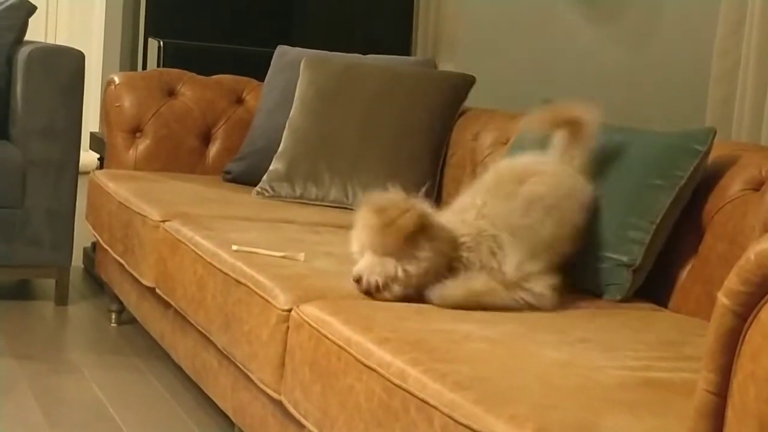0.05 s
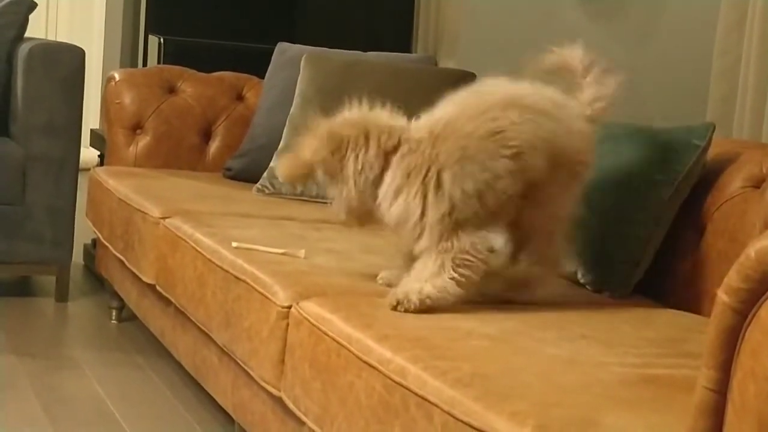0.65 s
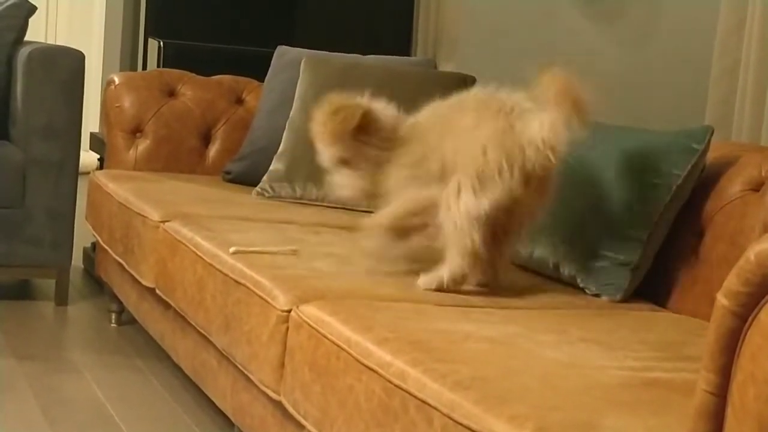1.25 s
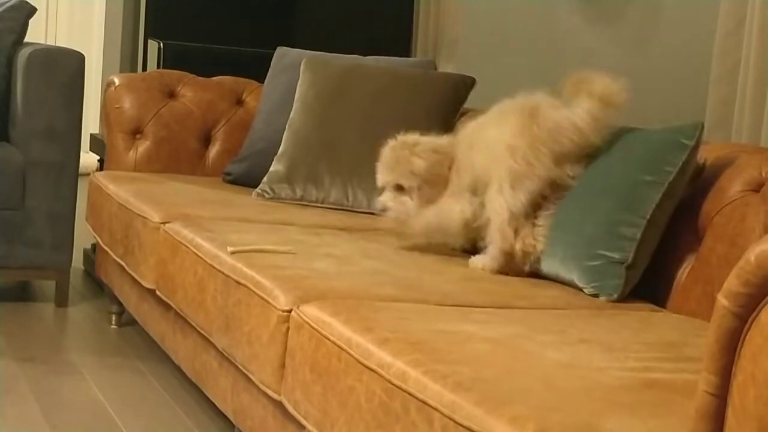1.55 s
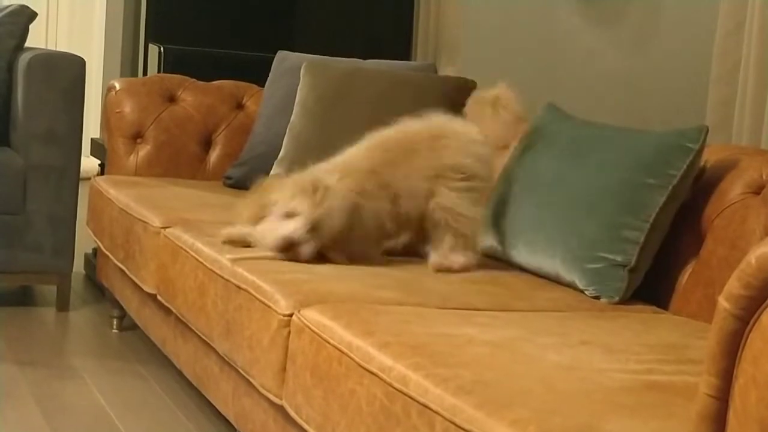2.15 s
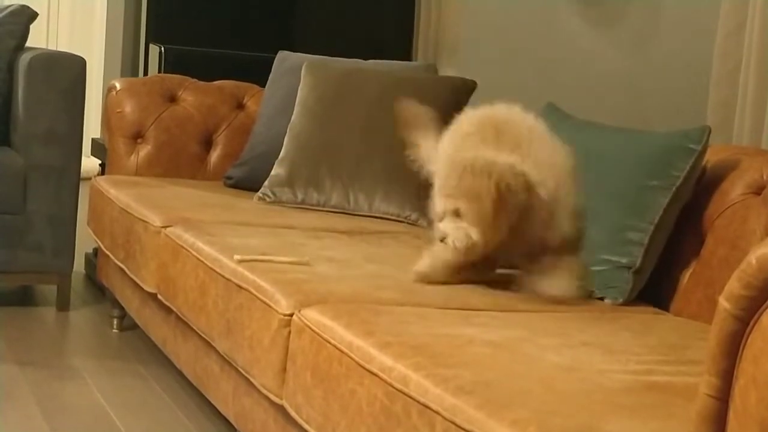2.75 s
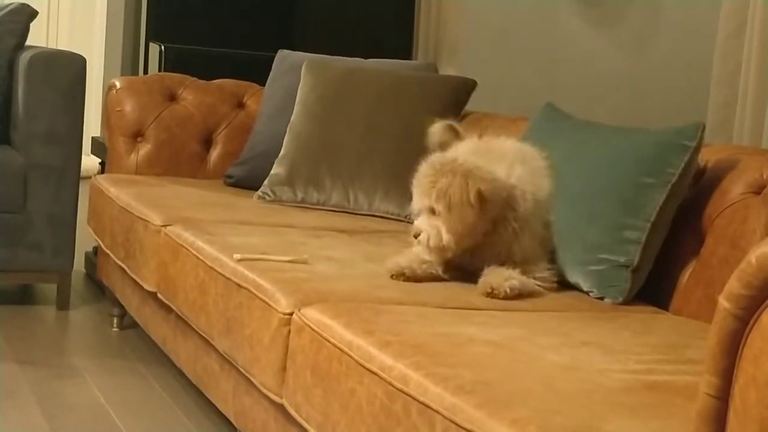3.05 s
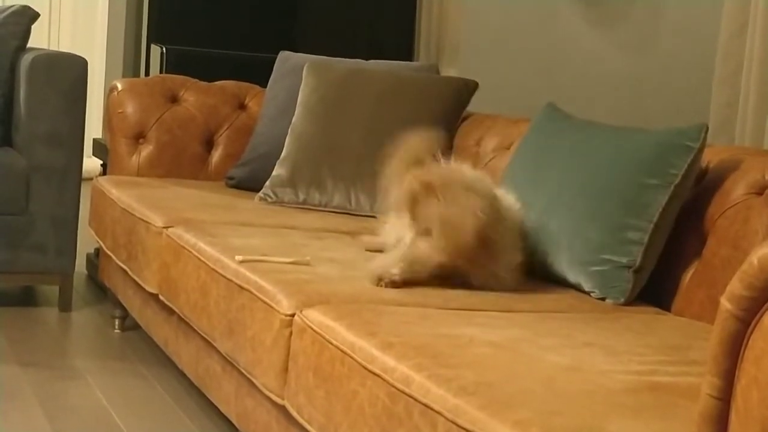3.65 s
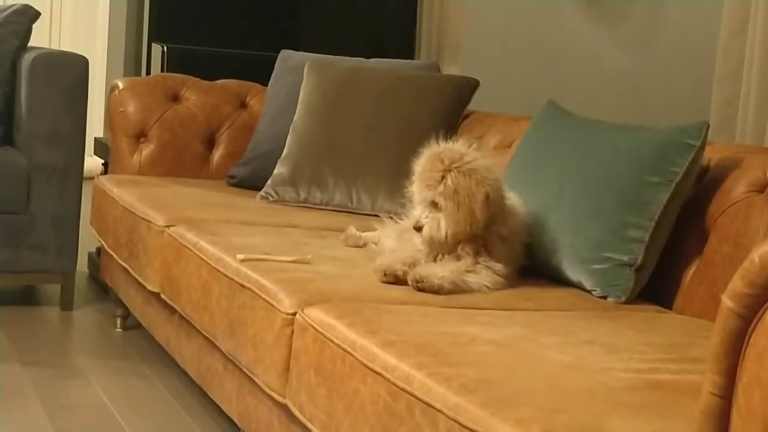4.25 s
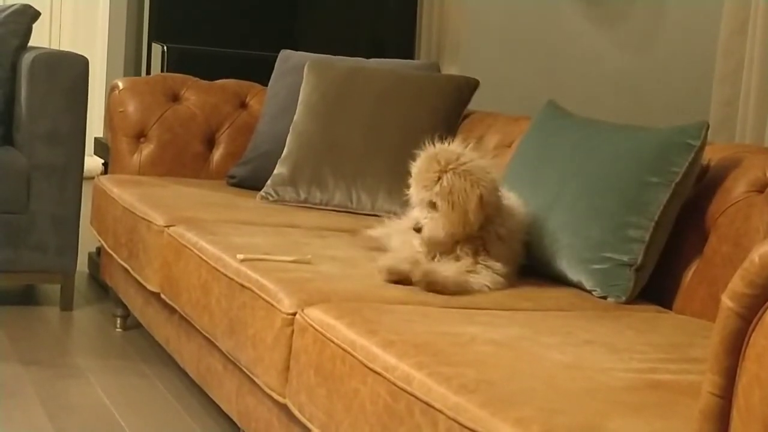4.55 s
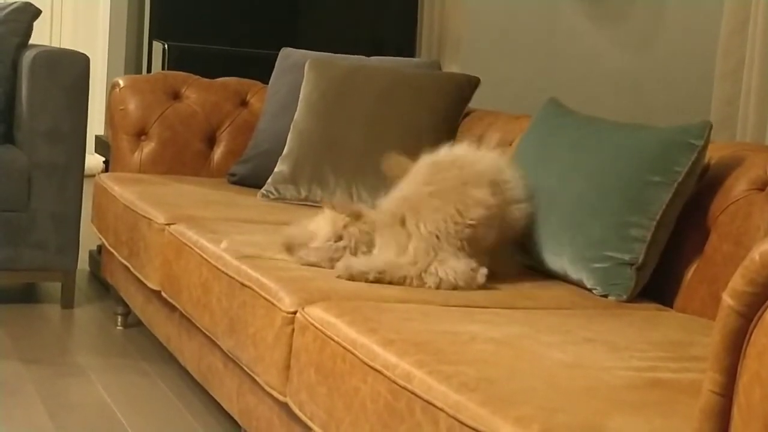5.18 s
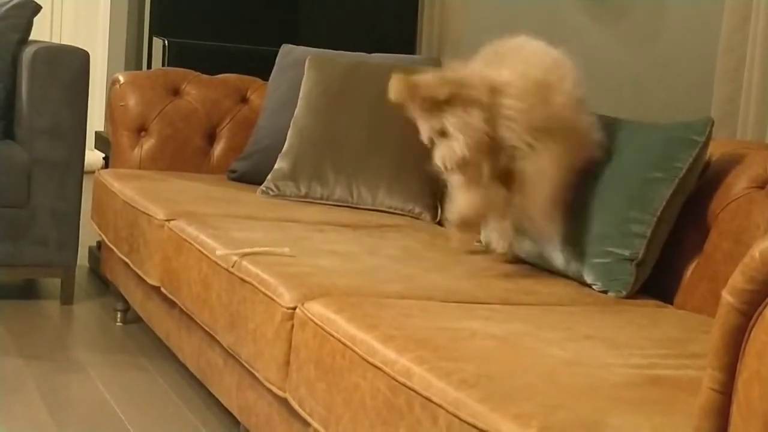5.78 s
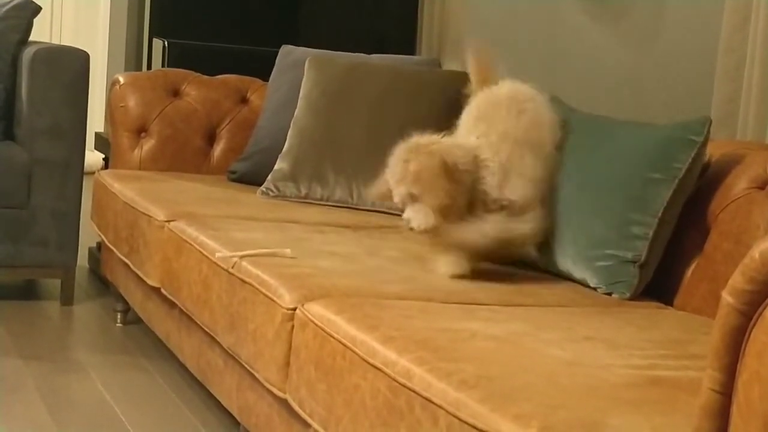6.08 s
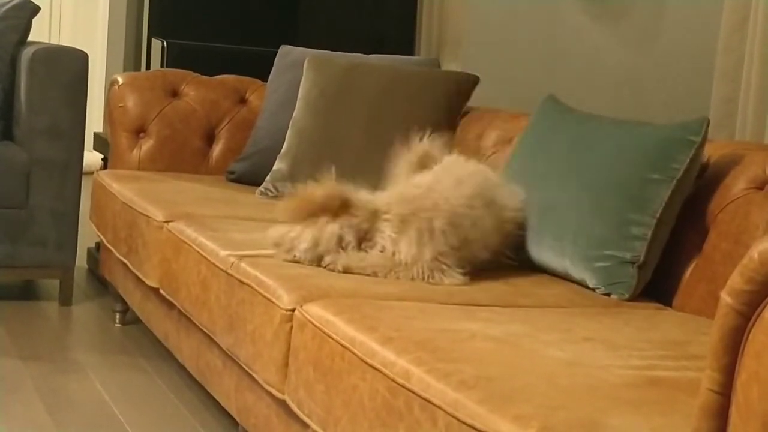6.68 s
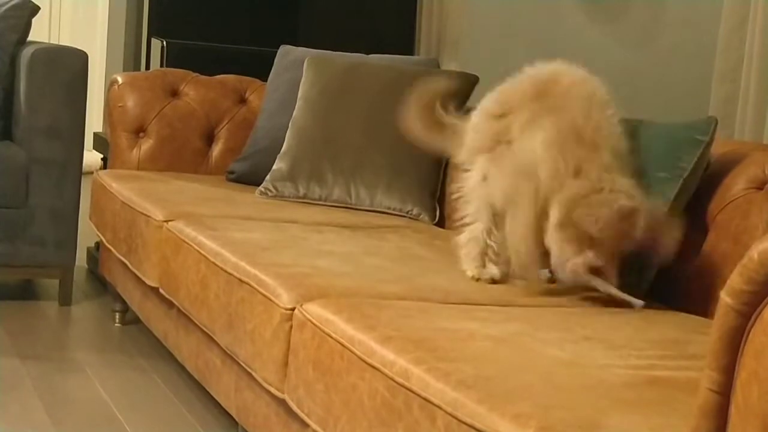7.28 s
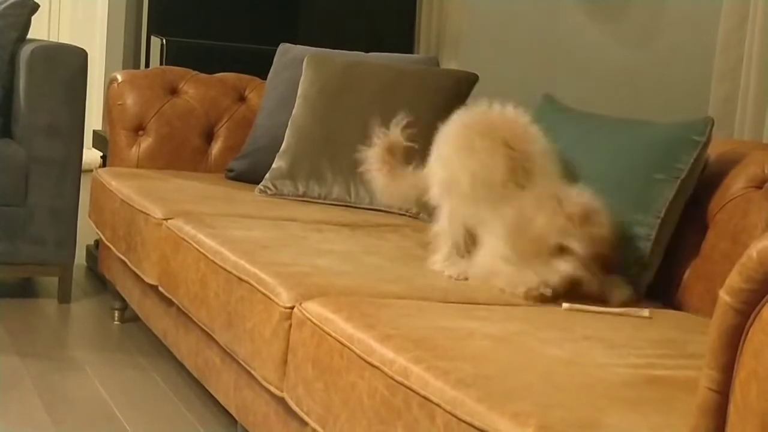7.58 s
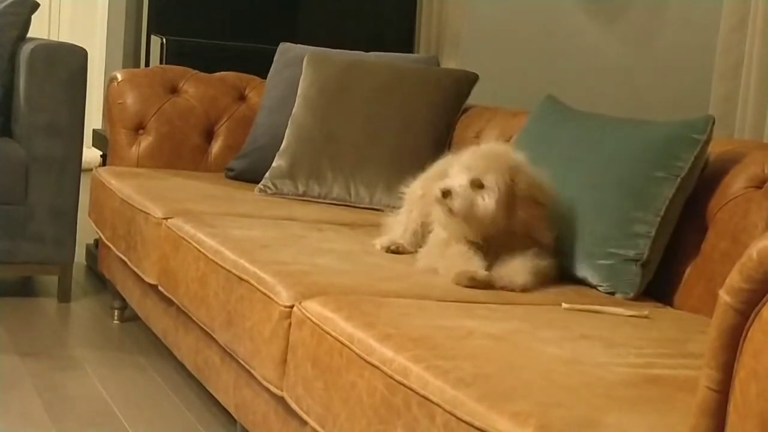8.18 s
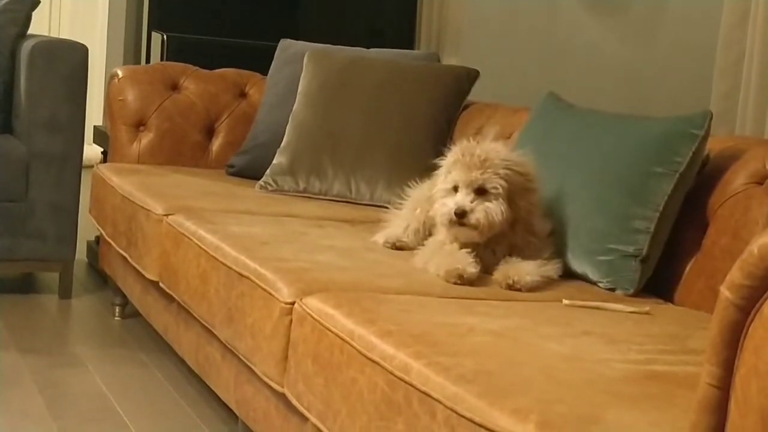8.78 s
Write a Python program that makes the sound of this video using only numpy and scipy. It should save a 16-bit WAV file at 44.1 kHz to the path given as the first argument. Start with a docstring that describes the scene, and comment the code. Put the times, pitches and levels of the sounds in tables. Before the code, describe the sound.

Irregular soft paw thuds and leathery scuffs as a small dog chases a chew stick across a sofa indoors.

```python
"""You hear soft thumps and swishes: a puppy chases a chew stick on a leather sofa in a quiet room.
Each paw landing slaps the leather, knocks the frame and makes the springy seat boom.
Fur and pads slide over leather and cushions, where countless tiny slips blend into a hiss.
Claws and the stick tick, and a small metal piece, probably a collar tag, clinks now and then."""
import sys
import numpy as np
from scipy import signal
from scipy.fft import rfft, irfft, next_fast_len
from scipy.io import wavfile

SR = 44100
rng = np.random.default_rng(int(sys.argv[2]) if len(sys.argv) > 2 else 0)


def dump_mix(stems):
    """Bounce the given channels to the path in sys.argv[1] as a 16-bit WAV at rate SR."""
    frames = np.atleast_2d(stems).T  # one column per channel
    limited = np.clip(frames, -1, 1)  # hard clip at full scale
    pcm = np.round(limited * 32767).astype(np.int16)
    wavfile.write(sys.argv[1], SR, pcm)


N = 389358

# Levels in the tables are starting points: the functions turn them up or down.
# The tone of each kind of noise. Columns: pitch_hz, level_db
ROOM_SPECTRUM = [(15, -9), (40, -13), (55, 2.5), (90, -11.5), (160, -17.5), (400, -22.5), (1200, -27),
                 (4500, -27), (6500, -29.5), (8500, -37.5), (11000, -33), (15000, -25.5)]
SWAY_SPECTRUM = [(15, 0.5), (25, -5), (34, 3.5), (44, -9), (62, 3.5), (90, -8.5), (130, -13.5), (250, -23)]
RUB_SPECTRUM = [(70, -27), (130, -8), (260, 3.5), (400, -0.5), (800, -1.5), (1300, -10), (2500, -19)]
SWISH_SPECTRUM = [(700, -10), (1300, -1.5), (2400, -4.5), (3500, 1.5), (4500, 0.5), (5500, -3.5),
                  (6500, -9), (8500, -15.5), (11000, -62)]
FUR_SPECTRUM = [(7000, -40), (9000, -14), (9800, -10.5), (11500, -3.5), (13800, -3), (15500, -10.5),
                (18000, -34)]
# How alike the two ears hear a noise. Columns: pitch_hz, likeness (0 to 1)
EAR_LIKENESS = [(60, 0.95), (250, 0.76), (500, 0.62), (1000, 0.3), (2000, 0.2), (4000, 0.0065), (12000, 0)]
# The slide noises tilt by pitch: left in the top treble, right around 4.6 kHz. Columns: pitch_hz,
# left_minus_right_db
SLIDE_LEAN = [(1500, 4.5), (3000, 0), (4600, -7.5), (6500, 2.5), (9000, 0), (11500, 6.5), (14000, 15)]

# Modes: the pitches a thing rings at when hit (wider ones die sooner).
# Columns: pitch_hz, width_hz, level_db
SEAT_MODES = [(35.3, 7.3, -63), (64.1, 15, -4), (90.2, 9, -2), (121.1, 8.1, -4.5)]
FRAME_MODES = [(150, 42, 0), (200.8, 14.8, 2), (259.3, 22, 0), (291.2, 30, -0.5), (331.6, 58, -5.5),
               (410, 108, -10.5)]
LEATHER_MODES = [(486.5, 38, 6), (611, 79, -1.5), (720, 75, -0.5), (900, 63, -1), (973, 60, 1),
                 (1180, 150, -5)]
SMACK_MODES = [(1400, 280, 4), (2060, 360, 0), (2600, 370, 0.5), (3660, 910, -5.5), (4300, 1200, -7)]   # leather right under a pad
CLAW_MODES = [(1330, 310, 3), (2110, 660, -5.5), (3050, 820, -4), (3680, 890, -1), (4320, 430, -1),
              (5300, 1200, -11)]
STICK_MODES = [(1450, 97, -2), (3540, 590, 2.5), (4400, 1100, 6), (5900, 470, 4.5)]
TAG_CLICK_MODES = [(9860, 160, 4.5), (12550, 1050, 1.5), (13500, 2400, 4)]
# The tag's ringing tones. Columns: pitch_hz, level_db, fade_s (time to fall by 60 dB)
TAG_TONES = [(9840, -28, 0.018), (11280, 2, 0.04), (11330, -7, 0.015), (13600, -18, .035),
             (14350, -16, .014)]

# How hard the puppy's shifting weight works the seat. Columns: time_s, level_db
BODY_EFFORT = [(0, -50.5), (0.3, -51), (0.7, -60.5), (1.5, -55), (2.3, -56), (2.6, -57), (2.95, -54),
               (3.35, -60), (3.8, -47.5), (4.2, -66), (4.7, -65.5), (4.93, -53.5), (5.4, -52.5),
               (5.75, -61), (6.3, -51), (7.15, -56.5), (7.55, -49), (8.3, -58.5), (8.83, -69)]
# The coat never lies quite still. Added to the effort level: swish_db, fur_db, rub_db
FIDGET_OFFSETS = [-23, -35.5, -13.5]
# The body or a paw slides. Columns: start_s, length_s, swell_share, swish_db, fur_db, rub_db
BODY_SLIDES = [(-0.05, 0.19, 0.22, -66.5, -72, -58.5), (0.15, 0.054, 0.44, -66, -66.5, -57),
               (0.53, 0.054, 0.35, -68.5, -75, -63.5), (0.62, 0.095, 0.73, -71, -77, -69.5),
               (0.8, 0.029, 0.27, -76, -75, -63), (0.86, 0.24, 0.39, -70.5, -81, -67),
               (1.12, 0.2, 0.58, -64.5, -72, -62.5), (1.36, 0.054, 0.69, -66.5, -75, -63.5),
               (1.47, .13, 0.32, -71, -79, -64), (1.91, 0.069, .7, -70, -84, -74),
               (2.02, 0.14, 0.14, -69, -70.5, -72), (2.17, 0.24, 0.41, -63, -70, -61.5),
               (2.52, 0.23, 0.38, -65, -73.5, -62), (2.88, 0.032, 0.92, -64.5, -72, -61),
               (2.98, 0.11, .3, -80, -84, -74), (3.28, 0.25, 0.29, -66.5, -77, -65),
               (3.7, 0.075, 0.7, -64, -76, -62), (4.71, 0.14, 0.59, -64.5, -72, -61.5),
               (4.89, 0.18, 0.67, -62.5, -72.5, -62), (5.18, 0.11, 0.084, -70, -73, -58),
               (5.43, 0.15, 0.61, -60, -63.5, -66.5), (5.56, 0.17, 0.44, -61.5, -68, -67),
               (5.72, 0.11, 0.35, -69.5, -73, -79), (5.86, 0.063, 0.64, -89, -94, -71),
               (5.95, 0.1, .3, -72.5, -76, -61), (6.27, 0.062, 0.25, -77, -96, -60),
               (6.46, 0.27, 0.47, -66, -72, -60), (6.74, 0.28, 0.64, -66, -71, -61),
               (7.11, 0.14, 0.38, -62, -65.5, -59), (7.425, 0.13, 0.31, -66.5, -70, -60),
               (7.58, 0.19, 0.48, -62.5, -72, -70), (8.17, 0.033, 0.31, -69.5, -89, -77),
               (8.27, 0.16, 0.27, -76, -83, -82)]
# A pad zips across the grain. Columns: middle_s, half_length_s, pitch_hz,
# glide_octaves (either side of the pitch), width_share (of the pitch), level_db
PAD_SCRAPES = [(0.193, 0.052, 4000, 0, 0.53, -58.5), (0.192, 0.067, 1500, 0.03, .9, -61.5),
               (0.49, 0.033, 3910, 0, 0.62, -67.5), (0.707, 0.028, 4450, -0.059, .3, -67),
               (0.808, .04, 3810, -0.03, 0.79, -65), (1.314, 0.029, 5280, 0, 0.38, -66),
               (1.423, 0.058, 3540, 0.036, 0.32, -71), (2.25, 0.043, 3070, 0.15, 0.13, -68),
               (2.423, 0.057, 3395, -0.31, .25, -63), (3.503, 0.052, 3900, 0.037, 0.68, -64),
               (4.88, 0.051, 3650, -0.018, 0.33, -63), (5.075, 0.047, 3960, -0.13, 0.21, -54.5),
               (5.145, 0.051, 4110, 0.18, 0.23, -59.5), (5.315, 0.043, 4300, 0, .45, -62),
               (5.531, 0.05, 4700, -.2, .4, -60), (5.669, 0.1, 3490, 0.24, 0.28, -62.5),
               (5.681, 0.1, 4750, .2, 0.22, -58), (6.53, .06, 4090, -0.26, 0.22, -68),
               (6.894, .07, 3730, -.4, 0.18, -74), (6.969, 0.14, 2650, -0.33, .17, -67),
               (6.996, 0.15, 5900, 0.069, .25, -72), (7.13, 0.043, 6480, .2, .13, -67),
               (7.207, 0.18, 6200, 0, 0.35, -67), (7.22, .07, 3800, 0.18, 0.34, -72),
               (7.22, 0.031, 920, 0.185, .2, -56.5), (7.686, .06, 1510, 0.21, 0.23, -62),
               (7.765, .08, 4190, -0.17, 0.54, -62), (8.195, 0.03, 3940, -0.013, .5, -65)]
# The tag clinks; rows with almost no ring are tiny high squeaks or ticks.
# Columns: start_s, ring_db, click_db
CLINKS_AND_SQUEAKS = [(0.397, -46, -80), (0.5361, -58, -71), (1.0869, -62, -80), (1.2305, -58, -64),
                      (1.266, -50, -59), (1.383, -72, -66), (1.738, -57.5, -70), (2.0373, -69, -68),
                      (2.211, -70, -62), (2.233, -70, -69), (2.4169, -72, -64), (2.686, -36.5, -62),
                      (5.197, -53, -59), (5.4953, -51, -61), (5.8441, -68, -71), (6.0167, -74, -80),
                      (7.1731, -46.5, -60), (7.324, -57, -66), (7.426, -53, -66), (7.5093, -60, -72),
                      (7.6047, -35, -55), (7.659, -39.5, -58), (8.2062, -65, -75), (8.3809, -73, -81)]
# The stick is knocked. Columns: start_s, level_db, flex_db (added to its lowest mode)
STICK_HITS = [(5.199, -54, 2), (5.8444, -55.5, -19), (6.639, -59, 21), (7.604, -48.5, -12),
              (7.6638, -43.5, 12), (8.355, -63, -17)]
# Claws and pads strike. Columns: start_s, level_db, favoured_pitch_hz
CLAW_HITS = [(0.7097, -48, 4000), (0.799, -52, 2600), (0.9592, -47, 1700), (1.2314, -44.5, 3400),
             (1.777, -48, 1700), (1.991, -45, 3300), (2.0385, -50, 4400), (2.294, -49, 3400),
             (2.438, -45, 3350), (2.57, -67, 3000), (2.614, -46, 3050), (2.685, -43, 4440),
             (2.8802, -45, 3040), (3.4484, -48, 1500), (3.6258, -32.5, 2600), (3.6267, -34, 3780),
             (3.6343, -41, 3000), (5.931, -53, 1500), (6.0177, -37.5, 4250), (6.018, -38, 2200),
             (6.027, -49, 2600), (6.266, -40, 2800), (6.692, -45, 1680), (7.145, -45, 1400),
             (7.255, -49, 1900), (7.2555, -44, 5300), (7.2625, -46, 1700), (7.423, -39, 2420),
             (7.4594, -49, 3800), (7.564, -57, 1600), (7.871, -62, 2000)]
# A paw lands; the spot it hits favours one pitch in each part of the sofa.
# Columns: start_s, frame_thud_db, seat_boom_db, leather_slap_db, seat_hz, frame_hz, leather_hz
PAW_LANDINGS = [(0.194, -42.5, -43.5, -59, 80, 272, 547), (0.797, -36, -51, -56, 129, 268, 776),
                (0.958, -50.5, -62, -55.5, 62, 345, 490), (1.054, -38.5, -43, -52.5, 80.5, 160, 480),
                (1.23, -35.5, -45, -69, 126, 169, 520), (1.246, -38, -45, -55, 71.4, 197, 480),
                (1.501, -42, -50, -57.5, 55, 204, 480), (1.571, -40, -49.5, -61, 137, 145, 485),
                (1.776, -42.5, -43, -52, 88, 205, 650), (1.991, -34, -40.5, -48, 84, 200, 790),
                (1.998, -50, -45, -70, 87, 207, 1000), (2.024, -43.5, -38.5, -73, 91, 137, 900),
                (2.129, -47, -42.5, -61, 100, 175, 560), (2.613, -40.5, -55, -55, 89, 200, 644),
                (2.649, -39, -52.5, -80, 135, 197, 560), (2.874, -43.5, -46.5, -56, 108, 137, 710),
                (2.968, -37, -47, -63, 113, 151, 660), (3.015, -44, -49, -69, 63.3, 194, 560),
                (3.446, -38.5, -62, -55.5, 65, 197, 740), (3.6241, -23.5, -35, -37.5, 97, 238, 650),
                (4.831, -42.5, -50.5, -63, 135, 198, 600), (4.918, -49, -42.5, -76, 68, 137, 560),
                (5.197, -47, -44.5, -66, 113, 248, 560), (5.223, -37, -40, -51, 110, 209, 555),
                (5.314, -39.5, -41.5, -53, 87, 199, 533), (5.38, -51, -41.5, -86, 65.6, 137, 560),
                (5.932, -35.5, -39.5, -57, 99, 155, 540), (6.017, -30, -37.5, -47.5, 100, 237, 650),
                (6.156, -46, -44, -84, 113, 137, 557), (6.264, -33, -38, -47.5, 59, 283, 685),
                (6.292, -40, -46.5, -59, 125, 150, 520), (6.363, -42, -38, -52.5, 96, 182, 605),
                (6.688, -40, -43.5, -50.5, 84, 197, 470), (7.144, -38, -34, -55, 91, 255, 620),
                (7.194, -40, -51, -69, 84.4, 214, 560), (7.255, -30, -64, -52, 90, 287, 990),
                (7.31, -41, -50, -62, 90, 290, 480), (7.423, -33, -45, -53, 77, 191, 577),
                (7.467, -35.5, -54, -55.5, 135, 172, 480), (7.553, -35.5, -39, -50, 78, 226, 440),
                (7.564, -35.5, -44, -51.5, 90, 170, 480), (7.652, -42.5, -51, -57.5, 78, 288, 490),
                (7.863, -39.5, -53, -51.5, 135, 160, 554), (8.215, -46.5, -74, -83, 97, 158, 560),
                (8.297, -48.5, -65, -66.5, 105, 268, 520)]


def from_db(db):
    """Turn decibels into a number to multiply by."""
    return np.exp(np.asarray(db) * np.log(10) / 20)


def rms_one(x):
    """Scale a sound so its average strength (rms) is 1."""
    return x / np.sqrt(np.mean(x ** 2) + 1e-20)


def at_hz(points, hz):
    """Read a table between its pitches, with octaves evenly spaced."""
    pitches, values = np.transpose(points)
    return np.interp(np.log(hz), np.log(pitches), values)


def filtered(x, order, hz, kind="low"):
    """Keep what lies below a pitch, or in a band between two."""
    return signal.sosfilt(signal.butter(order, hz, kind, fs=SR, output="sos"), x)


def add(out, start_s, sound):
    """Mix a stereo sound in at the given time."""
    start = max(round(start_s * SR), 0)
    out[:, start:start + sound.shape[1]] += sound[:, :N - start]


def pan(left_db):
    """Gains that make the left side left_db louder than the right."""
    return from_db(np.array([[left_db], [-left_db]]) / 2)


def stereo(mid, side, alike):
    """Blend two noises into left and right: alike is 1 for the same, 0 for unrelated."""
    alike = np.clip(alike, -1, 1)
    return np.sqrt(1 + alike) * mid + np.sqrt(1 - alike) * side * np.array([[1], [-1]])


def drift(rate_hz, step=40):
    """A slow random wobble, held between -2 and 2."""
    decay = np.exp(-2 * np.pi * rate_hz * step / SR)
    noise = rng.standard_normal(N // step + 2002)
    slow = signal.lfilter([1], [1, -2 * decay, decay * decay], noise)[2000:]   # let it settle first
    return np.clip(np.interp(np.arange(N) / step, np.arange(len(slow)), rms_one(slow)), -2, 2)


def coloured(white, spectrum, lean=None):
    """Give two white noises a tone and the stereo spread of the room."""
    size = next_fast_len(N, real=True)
    hz = np.maximum(np.fft.rfftfreq(size, 1 / SR), 1)
    inside = (hz > spectrum[0][0]) & (hz < spectrum[-1][0])
    both = stereo(*rfft(white, size), at_hz(EAR_LIKENESS, hz))
    both = both * from_db(at_hz(spectrum, hz)) * inside
    if lean:
        both = both * from_db(at_hz(lean, hz) * np.array([[1], [-1]]) / 2)
    return rms_one(irfft(both, size)[:, :N])


def resonate(x, modes):
    """Let a sound ring each mode, then trim what lies far below or above them."""
    out = 0
    for k, (hz, width_hz, level_db) in enumerate(modes):
        decay = np.exp(-np.pi * width_hz / SR)
        feedback = [1, -2 * decay * np.cos(2 * np.pi * hz / SR), decay * decay]
        ring = signal.lfilter([1, 0, -1], feedback, x)
        out = out + (-1) ** k * from_db(level_db) * np.sqrt(width_hz) * rms_one(ring)
    edges_hz = [modes[0][0] * 0.65, min(modes[-1][0] * 2.23, SR / 2 - 1)]
    return filtered(out, 2, edges_hz, "band")


def room_path(alike, early_db, early_fade_s, late_db, late_fade_s, size=SR // 2):
    """A click on the sofa as it reaches the listener: direct sound, near echoes, then the room's tail."""
    t = np.arange(size) / SR
    early = from_db(early_db) * rms_one(from_db(-60 * t / early_fade_s))
    late = from_db(late_db) * rms_one(from_db(-60 * t / late_fade_s))
    path = stereo(*rng.standard_normal((2, size)), alike) * (early + late) / np.sqrt(2 * size)
    path[:, 0] -= 1   # the direct sound
    return path


def struck_at(modes, spot_hz, db_per_octave):
    """The spot that is hit drives modes near one pitch best; those farther away are weaker."""
    return [(hz, width, db - db_per_octave * abs(np.log2(hz / spot_hz))) for hz, width, db in modes]


def blow(path, modes, level_db, vary_db, attack_s):
    """One hit rings the modes, a little differently each time; level_db is the rms over attack_s."""
    varied = [(hz, width, db + vary_db * rng.standard_normal()) for hz, width, db in modes]
    sound = resonate(path, varied)
    attack = sound[:, :int(attack_s * SR) + 1]
    return from_db(level_db) * sound / np.sqrt(np.mean(attack ** 2))


def room_air(level_db=-68.5):
    """The still air of the room: a faint, steady rumble and hiss."""
    return from_db(level_db) * coloured(rng.standard_normal((2, N)), ROOM_SPECTRUM)


def random_slips(per_s, spread_db, limit):
    """Single spikes at random moments, a few much bigger than the rest."""
    happens = rng.random(N) < per_s / SR
    return happens * from_db(spread_db * np.minimum(rng.exponential(1, N), limit))


def friction(per_s, spread_db, grain_db):
    """Countless tiny slips merge into a hiss; the larger ones stand out as grains."""
    slips = random_slips(per_s, spread_db, limit=4)
    hiss = rng.standard_normal((2, N))
    return hiss + from_db(grain_db) * rms_one(slips * rng.standard_normal((2, N)))


def stroke_power(strokes, release_s, sag_db_per_s=5.5):
    """Each stroke swells, sags and dies away; gives the total power of swish, fur and rub."""
    start_s, length_s, swell_share, *levels_db = np.transpose(strokes)
    steps = np.arange(0, N, 64)
    t, length_s = steps / SR - start_s[:, None], length_s[:, None]
    swell = np.sin(np.pi / 2 * np.clip(t / (swell_share[:, None] * length_s), 0, 1)) ** 2
    sag = from_db(-sag_db_per_s * np.maximum(t, 0))
    release = np.exp(-np.maximum(t - length_s, 0) / release_s)
    power = (swell * sag * release) ** 2
    return np.array([np.interp(np.arange(N), steps, from_db(db) ** 2 @ power) for db in levels_db])


def contact(effort_db, skid_s=0.0069, skid_swell_share=0.066):
    """Slides, a skid at each landing and constant fidgeting set how loud swish, fur and rub are."""
    skids = []
    for start_s, _, _, slap_db, *_ in PAW_LANDINGS:
        swish_db = -70 + 0.68 * (slap_db + 51)   # a harder slap skids louder
        fur_db, rub_db = swish_db - 5, swish_db + 11.5
        skids.append((start_s, skid_s, skid_swell_share, swish_db, fur_db, rub_db))
    slid = stroke_power(BODY_SLIDES, release_s=0.084)
    skidded = stroke_power(skids, release_s=0.056)
    fidget = from_db(FIDGET_OFFSETS)[:, None] * from_db(effort_db)
    return np.sqrt(slid + skidded + fidget ** 2)


def cushions(rub_gain, effort_db):
    """Shifting weight rubs the cushions and rocks the seat."""
    rub = coloured(friction(per_s=120, spread_db=2.9, grain_db=-6.5), RUB_SPECTRUM)
    sway = coloured(rng.standard_normal((2, N)), SWAY_SPECTRUM)
    return rub_gain * rub + from_db(effort_db) * sway


def touching_patches(swish, depth_db=4.0):
    """Patches of contact come and go, each turning its own narrow band of pitch up and down."""
    out = swish
    for hz in np.geomspace(1900, 6300, 8):
        patch = filtered(swish, 1, [hz / 1.04, hz * 1.04], "band")
        out = out + patch * (from_db(depth_db * drift(rate_hz=13.0)) - 1)
    return rms_one(out)


def scratches(pitch_count=9, width_hz=520):
    """Hairs and claws catch on the leather's grain, each making a tiny crack at one of a few pitches."""
    catches = random_slips(per_s=90, spread_db=5, limit=2)
    pitch_choice = rng.integers(0, pitch_count, N)
    cracks = 0
    for k, hz in enumerate(np.geomspace(1800, 5200, pitch_count)):
        kicks = catches * (pitch_choice == k) + 1e-9 * rng.standard_normal(N)
        cracks = cracks + resonate(kicks, [(hz, width_hz, 0)])
    heard = signal.fftconvolve(room_path(0.2, -6, 0.03, -3, 0.3), cracks[None], axes=1)
    return rms_one(heard[:, :N] * pan(left_db=-7.5))


def sliding(swish_gain, fur_gain, swish_db=1.0, fur_db=2.0, scratch_db=-6.5, judder_db=1.6):
    """Pads and fur drag over the leather, juddering a little and catching on the grain."""
    swish = coloured(friction(per_s=700, spread_db=1.5, grain_db=-13.0), SWISH_SPECTRUM, SLIDE_LEAN)
    leather = touching_patches(swish) + from_db(scratch_db) * scratches()
    fur = coloured(friction(per_s=730, spread_db=10.0, grain_db=-10.0), FUR_SPECTRUM, SLIDE_LEAN)
    judder = from_db(judder_db * drift(rate_hz=15.5))
    return (swish_gain * from_db(swish_db) * leather + fur_gain * from_db(fur_db) * fur) * judder


def pad_scrapes(gain_db=1.5, slips_per_s=2500):
    """A pad sticks and slips fast: a short rasp whose pitch glides with the paw's speed."""
    out = np.zeros((2, N))
    for middle_s, half_length_s, hz, glide_octaves, width_share, level_db in PAD_SCRAPES:
        size = int(2 * half_length_s * SR)
        slips = rng.standard_normal(size) * (rng.random(size) < slips_per_s / SR)
        grain = filtered(slips, 2, hz * width_share / 2)
        pitch_hz = hz * 2 ** (glide_octaves * np.linspace(-1, 1, size))
        tone = np.cos(2 * np.pi * np.cumsum(pitch_hz) / SR)
        rasp = np.hanning(size) ** 2 * rms_one(grain * tone)
        path = room_path(0.085, 1.7, 0.04, -1.6, 0.3)
        heard = signal.fftconvolve(path / np.sqrt(np.sum(path ** 2) / 2), rasp[None], axes=1)
        add(out, middle_s - half_length_s, from_db(level_db + gain_db) * heard)
    return out * pan(left_db=-3.6)


def clinks_and_squeaks(ring_gain_db=-4.0, detune_hz=35, vary_db=2.4):
    """A metal tag clicks and rings, soon hushed by fur; with almost no ring, one hears a tiny squeak."""
    out, t = np.zeros((2, N)), np.arange(SR // 10) / SR
    for start_s, ring_db, click_db in CLINKS_AND_SQUEAKS:
        shift_hz = rng.normal(0, detune_hz)   # the tag hangs differently every time
        ring = 0
        for hz, level_db, fade_s in TAG_TONES:
            fade = from_db(level_db + rng.normal(0, vary_db) - 60 * t / fade_s)
            ring = ring + fade * np.sin(2 * np.pi * (hz + shift_hz) * t)
        heard = signal.fftconvolve(room_path(0, -15, 0.05, -14.0, 0.46), ring[None], axes=1)
        add(out, start_s, from_db(ring_db + ring_gain_db) * heard / np.abs(heard.mean(0)).max())
        path = room_path(0, 0, 0.018, 2.3, 0.34)
        add(out, start_s, blow(path, TAG_CLICK_MODES, click_db, vary_db=2.0, attack_s=0.0021))
    return out * pan(left_db=18.0)


def chew_stick(gain_db=-2.0):
    """The knocked stick bends and springs back, which makes it clack."""
    out = np.zeros((2, N))
    (low_hz, low_width, low_db), *upper_modes = STICK_MODES
    for start_s, level_db, flex_db in STICK_HITS:
        modes = [(low_hz, low_width, low_db + flex_db)] + upper_modes
        path = room_path(0.42, -12, 0.04, -3, 0.2)
        add(out, start_s, blow(path, modes, level_db + gain_db, vary_db=2.5, attack_s=0.0037))
    return out * pan(left_db=-2.1)


def claws(gain_db=-10.0, top_hz=5800):
    """Claws strike with a brief crack, dulled by pads and fur."""
    out = np.zeros((2, N))
    for start_s, level_db, hz in CLAW_HITS:
        modes = struck_at(CLAW_MODES, hz, db_per_octave=9.0)
        path = room_path(0.33, -7.0, 0.02, -1.2, 0.3)
        add(out, start_s, blow(path, modes, level_db + gain_db, vary_db=3.0, attack_s=0.0012))
    return filtered(out, 4, top_hz) * pan(left_db=-2.1)


def paws(puff_s=0.0011, puff_lag_s=0.00301, padding_hz=1220):
    """A landing puffs air from the cushion, booms the seat, knocks the frame and slaps the leather."""
    body, surface = np.zeros((2, 2, N))
    puff_time = (np.arange(SR // 50) / SR - puff_lag_s) / puff_s
    # the dent sucks air in, then pushes it out
    puff = puff_time * np.exp((1 - puff_time ** 2) / 2) * np.ones((2, 1))
    for start_s, thud_db, boom_db, slap_db, seat_hz, frame_hz, leather_hz in PAW_LANDINGS:
        add(body, start_s, from_db(thud_db - 4.0) * puff)

        seat = struck_at(SEAT_MODES, seat_hz, db_per_octave=11.5)
        path = room_path(0.99, -0.8, 0.42, -1.9, 0.7, size=SR)
        add(body, start_s, blow(path, seat, boom_db - 6.0, vary_db=1.5, attack_s=0.092))

        frame = struck_at(FRAME_MODES, frame_hz, db_per_octave=9.5)
        path = room_path(0.94, -1.5, 0.18, 0.27, 0.68)
        add(body, start_s, blow(path, frame, thud_db - 10.5, vary_db=1, attack_s=0.037))

        leather = struck_at(LEATHER_MODES, leather_hz, db_per_octave=11.0)
        path = room_path(0.67, -0.63, 0.2, 3.3, 0.64)
        add(body, start_s, blow(path, leather, slap_db - 4.0, vary_db=1.4, attack_s=0.038))

        smack_db = slap_db - 15.5 + 0.1 * max(slap_db + 48, 0)   # the hardest slaps sound brighter
        path = room_path(0.21, 3.1, 0.18, 1.6, 0.73)
        smack = blow(path, SMACK_MODES, smack_db, vary_db=3.0, attack_s=0.025)
        add(surface, start_s + puff_lag_s / 2, smack)
    muffled = filtered(body, 6, padding_hz)   # the padding passes no treble
    muffled[1] = np.pad(muffled[1], (2, 0))[:N]   # the seat is a little left: the right ear hears it later
    return muffled + surface


def scene():
    """The puppy on the sofa, over the still air of the room."""
    effort_db = np.interp(np.arange(N) / SR, *np.transpose(BODY_EFFORT))
    swish_gain, fur_gain, rub_gain = contact(effort_db)
    air = room_air()
    hits = paws() + claws() + chew_stick() + clinks_and_squeaks()
    rubbing = sliding(swish_gain, fur_gain) + pad_scrapes() + cushions(rub_gain, effort_db)
    return air + rubbing + hits


def record(dry, cutoff_hz=15700):
    """The very highest treble is cut off steeply."""
    return signal.sosfilt(signal.ellip(10, 0.1, 70, cutoff_hz, fs=SR, output="sos"), dry)


dry = scene()
out = record(dry)
dump_mix(out)
```